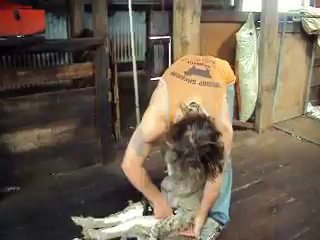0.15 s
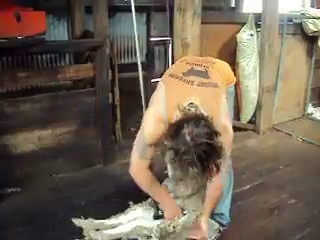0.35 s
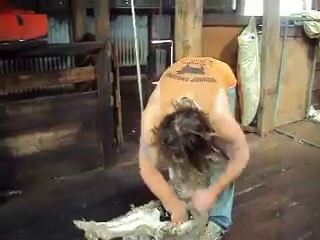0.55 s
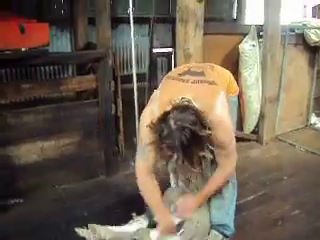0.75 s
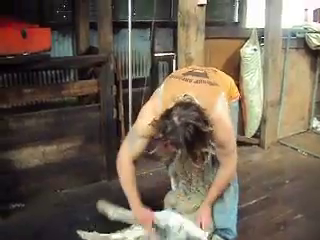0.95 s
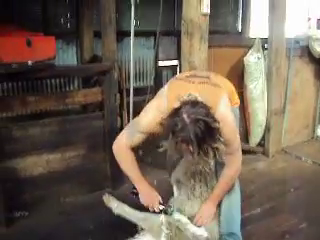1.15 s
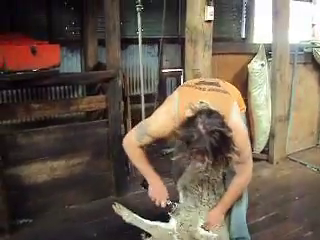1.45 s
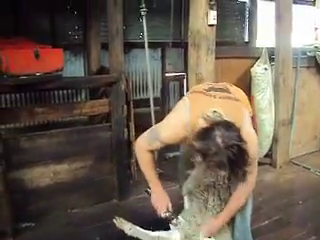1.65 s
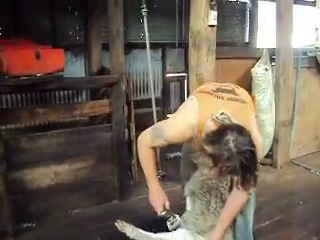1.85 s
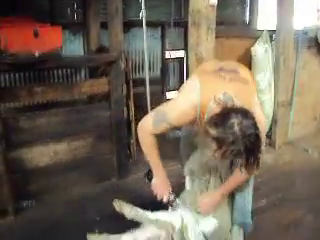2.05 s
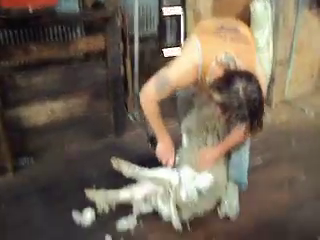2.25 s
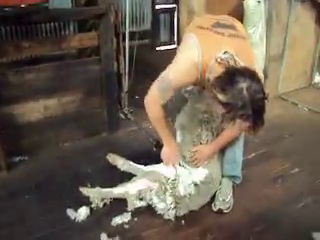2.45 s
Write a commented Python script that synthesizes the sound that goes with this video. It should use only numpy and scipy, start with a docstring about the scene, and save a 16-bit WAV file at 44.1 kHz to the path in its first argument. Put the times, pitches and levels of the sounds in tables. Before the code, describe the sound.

A motorised sheep shearing handpiece buzzes and rattles steadily through wool in a shed.

```python
"""Sheep shearing in a wooden shed

A shaft-driven handpiece works through a fleece while the overhead motor hums and whines steadily.
Its cutter slaps at both ends of the swing, ringing the steel comb and rattling the drive joints,
and rasps in between. One small microphone stands far enough off to hear as much shed as direct
sound in the strokes, which blur into a dense buzz."""
import sys
import numpy as np
from scipy import signal
from scipy.fft import rfft, irfft
from scipy.io import wavfile
from scipy.ndimage import uniform_filter1d

SR = 44100
rng = np.random.default_rng(int(sys.argv[2]) if len(sys.argv) > 2 else 0)


def file_out(sig):
    """Save sig as 16-bit WAV at sys.argv[1]."""
    # one column per channel
    cols = np.atleast_2d(sig).T
    # limit, then scale
    lim = np.clip(cols, -1, 1)
    pcm = np.round(lim * 32767).astype(np.int16)
    wavfile.write(sys.argv[1], SR, pcm)


N = 114660
TIME = np.arange(N) / SR
RETURN_DB = -5  # return stroke against forward stroke


def undb(db):
    """Decibels to gain."""
    return 10 ** (np.asarray(db) / 20)


def unit(x):
    """Scale to rms 1."""
    return x / np.sqrt(np.mean(x ** 2))


def curve(rows):
    """Join each column by straight lines; the first column is the time in seconds."""
    when, *columns = np.array(rows, float).T
    return np.squeeze([np.interp(TIME, when, c) for c in columns])


def wander(rate_hz):
    """Smooth random drift, rms 1."""
    hold = int(SR / rate_hz)
    steps = np.repeat(rng.standard_normal(200), hold)[:N]
    return unit(uniform_filter1d(uniform_filter1d(steps, hold), hold))


def colour(x, points):
    """Shape a sound by (Hz, dB) points, rolling off beyond both ends; rms 1."""
    hz, db = np.array(points, float).T
    f = np.maximum(np.fft.rfftfreq(N, 1 / SR), 1)
    gain = undb(np.interp(np.log(f), np.log(hz), db))
    skirts = np.minimum(f / hz[0], 1) * np.minimum(hz[-1] / f, 1)
    return unit(irfft(rfft(x) * gain * skirts ** 2, N))


def shed(x, t60_s=0.61, wet_db=0.5, move_s=0.2446):
    """Direct sound plus a short diffuse tail, whose pattern changes as the handpiece moves."""
    t = TIME[:SR // 2]
    fade = np.exp(-np.log(1000) * t / t60_s) * (t > .003)
    source, wet = rfft(x), 0
    for place, noise in enumerate(rng.standard_normal((14, len(t)))):
        tail = rfft(noise * fade / np.linalg.norm(fade), N)
        crossfade = np.cos(np.pi / 2 * np.clip(TIME / move_s - place, -1, 1))
        wet = wet + irfft(source * tail, N) * crossfade
    return unit(x + undb(wet_db) * wet)


def slaps(turns, jitter_s, scatter_db):
    """One impact at each end of the cutter's swing, a little uneven in time and force."""
    stroke = np.arange(1, int(2 * turns[-1]))
    late, force = rng.standard_normal((len(stroke), 2)).T
    at = (np.interp(stroke / 2, turns, TIME) + jitter_s * late) * SR
    strength = undb(scatter_db * force + RETURN_DB * (stroke % 2))
    out = np.zeros(N)
    out[np.clip(at.astype(int), 0, N - 1)] = strength * (-1.) ** stroke
    return unit(out)


def chatter(turns, decay_strokes, floor):
    """Fine rubbing noise that flares at each stroke and sinks toward a steady floor."""
    returning = np.floor(2 * turns) % 2
    flare = np.exp(-(2 * turns % 1) / decay_strokes) * undb(RETURN_DB * returning)
    return unit(rng.standard_normal(N) * (floor + flare))


def motor(hum_hz=100):
    """Overhead, a smooth mains hum lies under thin, wavering motor and gear tones."""
    # Mains hum. Each row: time in seconds, level in dB.
    hum_levels = [(0, -29.5), (.8, -30.4), (1.15, -30.5), (2.6, -30.5)]
    # Motor and gear tones. Each row: frequency in Hz, average level in dB.
    whine_tones = [(484, -50), (618, -52), (742.5, -53.5), (1164, -53), (1264, -52.5), (1363.5, -53.5),
                   (1523, -56.5), (2074, -53.5), (2256, -57.5), (2450, -59.5), (2853, -59.5)]
    hum = undb(curve(hum_levels)) * np.sin(2 * np.pi * hum_hz * TIME + .04 * wander(5.3))
    whine = 0
    for hz, db in whine_tones:
        gain = undb(db + 2.5 * wander(4))
        whine += gain * np.sin(2 * np.pi * (hz * TIME + rng.random()) + 1.1 * wander(6))
    return np.sqrt(2) * (hum + whine)


def drive(turns):
    """Loose joints knock twice a turn, the handpiece shakes, the shaft rumbles."""
    # Spectra of the joints and the shaft. Each row: frequency in Hz, relative level in dB.
    rattle_spectrum = [(170, 8), (230, -11), (400, -4.5), (520, 2), (930, 1.5), (1300, -2.5), (1650, -8.5),
                       (2100, -9), (3000, -29)]
    rumble_spectrum = [(15, -0.5), (35, -3.5), (60, 0.5), (110, -0.5), (170, -1.5), (240, 1), (320, -1),
                       (500, -7), (1000, -13.5), (3000, -40)]
    # Rattle of the joints. Each row: time in seconds, level in dB.
    rattle_levels = [(0, -34.5), (.12, -37), (.26, -35.5), (.39, -32), (.56, -35.5), (.72, -37.5),
                     (.85, -34), (.95, -36.5), (1.1, -35.5), (1.4, -38), (1.78, -34.5), (1.92, -36),
                     (2.22, -33.5), (2.36, -33.5), (2.46, -37), (2.6, -35.5)]
    # Tones of the shaking handpiece. Each row: multiple of the crank speed, average level in dB.
    shake_tones = [(4, -48), (5, -56.5), (10, -55.5), (11, -61), (15, -55), (17, -53), (19, -54.5)]
    knocks = undb(-16) * slaps(turns, jitter_s=0.00018, scatter_db=3)
    rubbing = chatter(turns, decay_strokes=0.26, floor=1.3)
    rattle = colour(shed(knocks + rubbing), rattle_spectrum) * undb(curve(rattle_levels))
    shake = 0
    for multiple, db in shake_tones:
        gain = np.sqrt(2) * undb(db + 2.5 * wander(5))
        shake += gain * np.sin(2 * np.pi * (multiple * turns + rng.random()) + 0.63 * wander(8))
    rumble = undb(-38.5) * colour(rng.standard_normal(N), rumble_spectrum)
    return rattle + shake + rumble


def wool(turns, ramp_s=0.082):
    """Each blow, one push through the fleece, adds a band of crunching pulsed by the strokes."""
    # Each row: start and length in seconds, level in dB if fully ramped up, centre and width in Hz.
    blows = [(-.1, 1.07, -42.5, 1417, 548), (.28, .63, -42.5, 2280, 400), (.7, 0.16, -37.5, 2800, 420),
             (1.4, 0.37, -44, 2110, 380), (2.31, 0.1, -38, 2100, 1500), (2.55, .2, -34, 2900, 250)]
    out = np.zeros(N)
    for start, length, db, hz, width in blows:
        band = signal.butter(1, [hz - width / 2, hz + width / 2], "bandpass", fs=SR, output="sos")
        cutting = shed(chatter(turns, decay_strokes=.3, floor=0.32))
        crunch = unit(signal.sosfilt(np.vstack([band, band]), cutting))
        ramp = np.clip(np.minimum(TIME - start, start + length - TIME) / ramp_s, 0, 1)
        out += crunch * undb(db) * ramp
    return out


def cutter(turns):
    """The cutter rings the steel comb at each reversal and rasps across its teeth."""
    # Each row: time in seconds, clatter level in dB, rasp level in dB.
    cutter_levels = [(0, -34.5, -38), (.1, -33.5, -38.5), (.4, -34, -39), (.6, -34, -40), (.8, -34, -39.7),
                     (.93, -34.3, -40.5), (1.05, -37, -42), (1.3, -37, -41), (1.65, -35, -40.5),
                     (1.82, -38, -41), (1.97, -35, -39.5), (2.08, -36.5, -40), (2.23, -35.5, -40.5),
                     (2.4, -36, -41), (2.54, -36.3, -42), (2.6, -36.5, -40)]
    # Spectra of the ringing comb and its teeth. Each row: frequency in Hz, relative level in dB.
    clatter_spectrum = [(1400, -33.5), (1850, -9.5), (2150, -3.5), (2500, -4), (2800, 0), (3050, -2.5),
                        (3350, -3), (3800, -9), (4600, -15), (5400, -31.5), (6100, -58.5)]
    rasp_spectrum = [(2000, -14), (3300, -2), (3900, 0), (4500, -1.5), (4850, 1), (5200, -3), (5600, -9.5),
                     (5900, -20), (6200, -38)]
    clatter_db, rasp_db = curve(cutter_levels)
    hits = undb(-8) * slaps(turns, jitter_s=.00006, scatter_db=4)
    rubbing = chatter(turns, decay_strokes=.25, floor=0.61)
    clatter = colour(shed(hits + rubbing), clatter_spectrum) * undb(clatter_db)
    rasp = colour(chatter(turns, decay_strokes=0.27, floor=2.5), rasp_spectrum) * undb(rasp_db)
    return clatter + rasp


def scene():
    """On the shearing floor, one crank drives rattle, cutter and crunch over the motor's hum."""
    # Crank speed, rising when the comb runs light. Each row: time in seconds, turns per second.
    crank_speeds = [(0, 56.3), (.45, 56.1), (.9, 55.9), (1.1, 56.7), (1.35, 56.6), (1.6, 56.2),
                    (1.9, 56.25), (2.3, 56.45), (2.6, 56.3)]
    turns = np.cumsum(curve(crank_speeds) * (1 + .0015 * wander(10))) / SR
    return (drive(turns) + cutter(turns) + wool(turns) + motor())[None]


def record(dry, top_hz=6150):
    """A small mono microphone with a narrow bandwidth: the treble ends steeply."""
    return signal.sosfilt(signal.ellip(12, .1, 90, top_hz, fs=SR, output="sos"), dry)


dry = scene()
out = record(dry)
file_out(out)
```